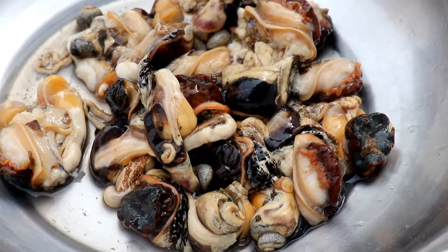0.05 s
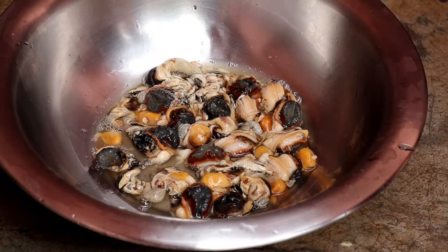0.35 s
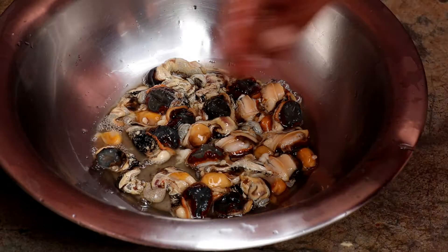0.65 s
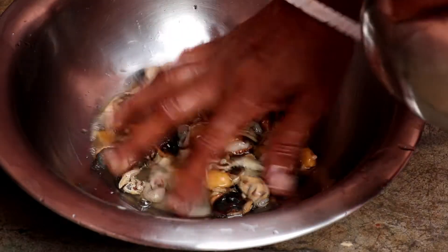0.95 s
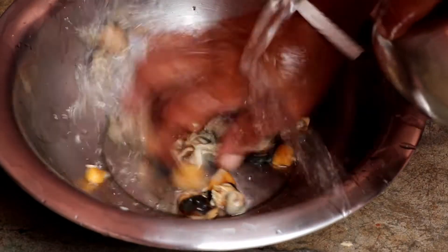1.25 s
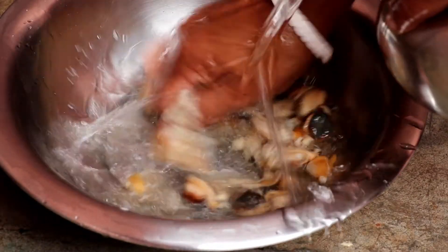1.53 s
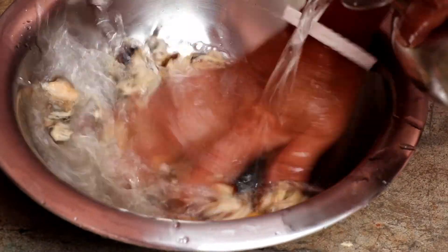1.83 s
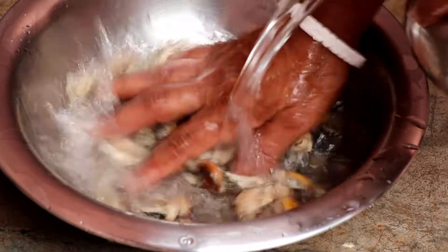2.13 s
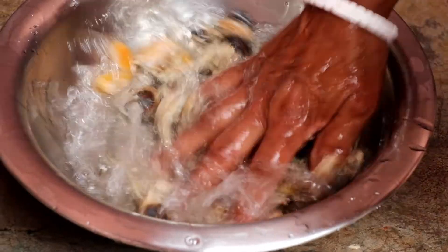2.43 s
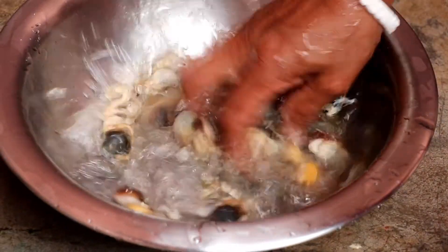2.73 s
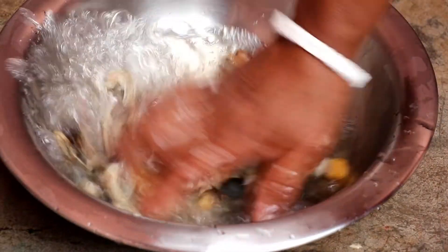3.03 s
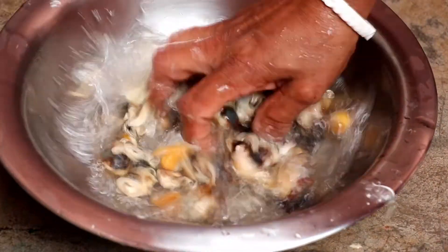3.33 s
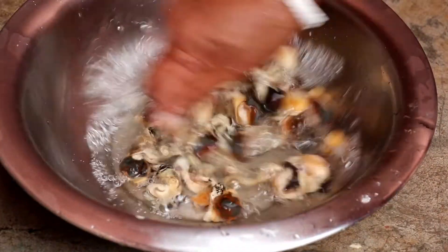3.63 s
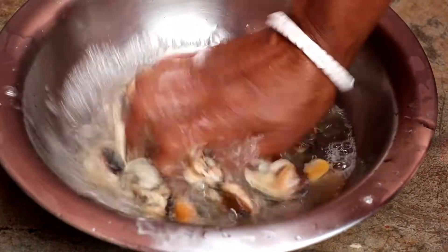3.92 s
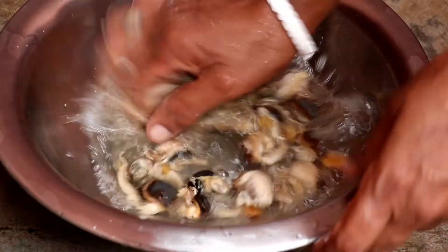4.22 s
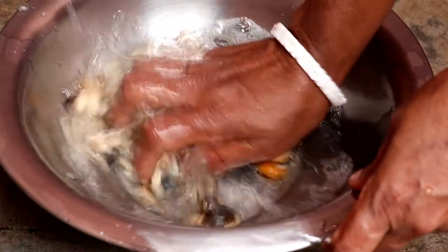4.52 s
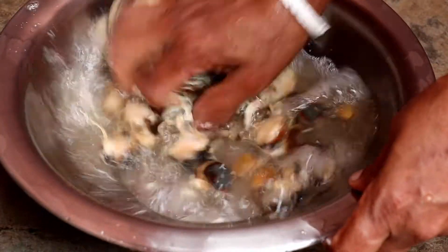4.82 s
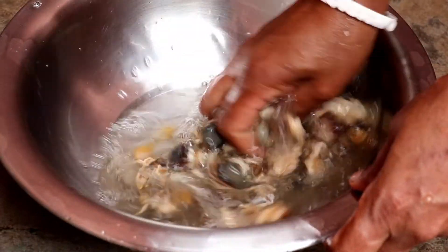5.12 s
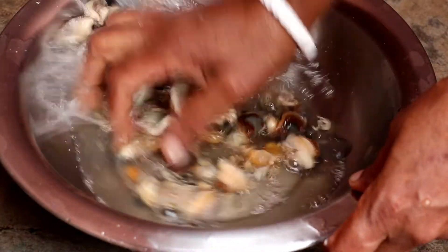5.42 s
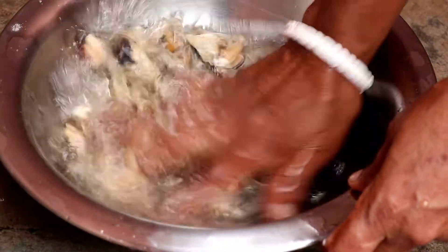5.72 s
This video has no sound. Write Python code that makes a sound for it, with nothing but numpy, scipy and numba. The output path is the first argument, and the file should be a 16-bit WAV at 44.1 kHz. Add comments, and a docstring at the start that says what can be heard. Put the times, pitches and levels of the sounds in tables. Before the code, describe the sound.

Close splashing and sloshing as shellfish meat is washed by hand in a metal bowl, with poured water and occasional clanks.

```python
"""Close over a steel bowl, shellfish meat is washed by hand. Water pours in from a pot and the hand
swirls it in strokes: bubbles ring and spray fizzes in swells, air pockets plop, and sheets of water
slap the wall. Knocks from pot, hand and shells ring the bowl, which also sings softly as it is rubbed.
Before the pouring come a fading hiss, two light contacts and a small bird peeping some way off.
Midway, a few puffs of air push against the microphone."""
import sys
import numpy as np
from scipy import signal
from scipy.fft import rfft, irfft
from scipy.io import wavfile
from scipy.ndimage import uniform_filter1d
from numba import njit

SR = 44100
rng = np.random.default_rng(int(sys.argv[2]) if len(sys.argv) > 2 else 0)


def transcribe(signal):
    """Save signal, clipped to [-1, 1], as a 16-bit WAV file at the path in sys.argv[1]."""
    frames = np.atleast_2d(signal).T
    limited = np.clip(frames, -1, 1)
    pcm = np.round(limited * 32767).astype(np.int16)
    wavfile.write(sys.argv[1], SR, pcm)


N = 262836
TIME = np.arange(N) / SR

# EQ curves of the room tone, the opening hiss and the air puffs: frequency_hz, level_db
ROOM_TONE_EQ = [(18, -40), (40, -19), (110, -13), (190, -7), (380, -8), (700, -19), (1110, -18),
                (2130, -22), (3880, -23), (10700, -35), (15000, -57)]
HISS_EQ = [(88, -61), (150, -37), (262, -20), (318, -30), (364, -11), (459, -20), (1050, -2), (1640, -20.5),
           (2920, -12.5), (3400, -14.5), (3970, -14.5), (4370, -26.5), (15000, -32)]
PUFF_EQ = [(12, -58), (20, -23.5), (75, -14), (161, -11.5), (197, -11.5), (231, -8), (300, -3.5),
           (390, -46.5), (660, -120)]
# Puffs of air on the microphone: crest_s, rise_s, fall_s, level_db
AIR_PUFFS = [(2.8, .09, .13, -61), (3.255, .022, .028, -34), (3.405, .012, .016, -48),
             (3.445, .015, .02, -51), (3.473, .012, .018, -40), (3.55, .03, .025, -53),
             (3.625, .025, .03, -56), (3.705, .04, .03, -58)]
# The bird's rising peeps: start_s, length_s, start_hz, end_hz, level_db
BIRD_PEEPS = [(0.465, 0.13, 3290, 3930, -57), (0.723, 0.15, 3200, 3930, -52.5),
              (0.997, 0.14, 3210, 3800, -51.5)]
# Light dry contacts before the pouring: start_s, level_db, centre_hz, decay_s
DRY_CLACKS = [(0.27, -18, 1355, 0.0054), (0.677, -30.5, 8300, 0.0045)]
# EQ curve of those contacts: frequency_hz, level_db
CLACK_EQ = [(88, -64), (150, -40), (484, -37), (566, -13), (821, -22), (1100, 3.5), (1420, -17),
            (1720, -7.5), (3620, -9.5), (7040, -14.5), (7920, -23), (9820, -17), (16000, -39)]
# Faint hollow tones round the bowl: start_s, length_s, centre_hz, width_hz, level_db
HOLLOW_TONES = [(0.38, 0.55, 1600, 530, -72.5), (5.1, 0.4, 533, 220, -58.5), (5.11, 0.19, 1200, 410, -44),
                (5.09, 0.11, 3520, 450, -47.5), (5.27, 0.25, 1080, 400, -50.5)]
# Soft notes of the rubbed bowl: crest_s, rise_s, fall_s, pitch_hz, glide_hz_per_s, level_db
RUB_NOTES = [(3.9, 0.025, 0.086, 873, 0, -45), (5.0, 0.038, 0.055, 554, 204, -48.5),
             (5.065, 0.048, 0.071, 588, -1.5, -49.5), (5.225, 0.15, 0.067, 767, -100, -40),
             (5.431, 0.089, 0.19, 767, -170, -50)]
# Modes of the steel bowl with a little water in it: pitch_hz, level_db, t60_s
BOWL_MODES = [(555, -11, .27), (673, -22, .3), (765, -21, .28), (971.7, -1, .19), (1015, -8, .12),
              (1192, -8, .13), (1422, 0, .19), (1580, -15, .2), (1744, -10, .12), (2016, -6, .087)]
# Blows on the bowl: start_s, contact_db, first_mode_hz, second_mode_hz, middle_hz, bite_hz, level_db,
# thud_db, bite_db, crack_db, decay_s, ring_db, ring_time_ratio
# (thud, bite, crack and ring are relative to level_db)
BOWL_KNOCKS = [(1.102, -37, 1006, 1440, 1060, 4120, -37.5, -25, 6, 5, 0.039, 3.5, 2.2),
               (1.128, -32, 985, 1454, 1430, 4020, -39, -7.5, 5, 1, 0.035, 12, 1.44),
               (1.312, -20, 938, 1424, 878, 4100, -33.5, -3.5, 4.5, 3.5, 0.051, 6.5, 1.1),
               (1.87, -25.5, 934.4, 1412, 880, 4450, -28.5, -6.5, 1, 2.5, 0.027, 6, 1.63),
               (2.461, -16.5, 966, 1436, 1190, 3600, -22, -22, -9, -18, 0.012, -4, 0.89),
               (2.718, -8, 1127, 1340, 1313, 4000, -19.5, -30.5, 6, -3.5, 0.0053, -7, .5),
               (3.114, -14, 926, 1480, 1050, 2700, -25, 3, 0, -19, .009, 4.5, 1.15),
               (3.306, -5.5, 983, 1368, 1160, 4070, -17.5, -21.5, -8, -14.5, 0.013, 2, 0.47),
               (3.322, -7.5, 1020, 1374, 1260, 4100, -23, -15, -8.5, -21, 0.016, 0, 0.74),
               (3.453, -13, 1058, 1393, 1400, 3700, -22.5, -15, -9.5, -20.5, .03, -2, 0.69),
               (5.097, -3, 890, 1340, 1200, 3440, -11, -16, -8, -8, 0.0064, -14.5, 1.03),
               (5.662, -6, 899, 1310, 1250, 3620, -20.5, -21, -26, -9, 0.0083, -7, 1.6),
               (5.819, -5, 1182, 1500, 1370, 3770, -25, -40, 6, -12, 0.004, -7.5, 0.92)]
# Slaps of water: start_s, tick_db, centre_hz, spray_db, body_re_spray_db, decay_s
WATER_SLAPS = [(1.3877, -6, 6800, -25.5, 2.5, 0.045), (1.4287, -3, 2480, -16, -2, 0.0035),
               (1.732, -5, 7700, -22.5, -1.5, 0.0066), (1.844, -18, 5140, -24, -18, 0.0024),
               (2.2289, -17, 6650, -19, -4, 0.0055), (2.462, -12, 8400, -17.5, -17, 0.0026),
               (2.536, -22, 4860, -26.5, 6, .007), (2.849, -2, 10300, -24.5, -14, .004),
               (2.931, -23, 9400, -27, -2, 0.0036), (3.018, -36.5, 9300, -36, -13, 0.0045),
               (3.072, -32, 8500, -45.5, -2.5, 0.013), (3.223, -9, 7530, -19, 0.5, .0057),
               (3.768, -28, 11500, -38, -18, 0.015), (3.78, -34, 6440, -43.5, -17, .004),
               (3.954, 0, 6400, -30.5, -19, 0.019), (4, 5, 3750, -20, -8.5, .011),
               (4.303, -13.5, 3500, -33, -6, 0.0095), (4.337, -14, 7200, -34.5, -4, .0044),
               (4.476, -5, 8900, -25.5, -20, 0.012), (4.594, 2, 6900, -25.5, 6, 0.0021),
               (4.816, -22, 8600, -40, -14, 0.004), (5.172, -38, 8700, -45, -12, 0.0055),
               (5.2473, -26.5, 8500, -44.5, -36, 0.003), (5.43, -35, 3640, -29, -3, .016),
               (5.486, -20, 7900, -33.5, -4, .0064), (5.647, 1, 3470, -21.5, -5, 0.015),
               (5.8, 3.5, 3220, -25, -1, 0.0078), (5.819, -6, 7200, -19.5, -2, 0.0029),
               (5.9282, -13, 3440, -24.5, -32, 0.02)]
# Air pockets snapping shut: start_s, level_db, pitch_hz, decay_s
AIR_POCKETS = [(1.202, -18.5, 2780, 0.0034), (1.215, -13.5, 3320, 0.0033), (1.262, -20, 2690, 0.0088),
               (1.29, -16, 3040, 0.0055), (1.417, -11, 2330, 0.0049), (1.602, -20, 1640, 0.0072),
               (1.757, -13.5, 2940, 0.019), (1.761, -11, 1262, 0.0097), (1.772, -12.5, 1180, .0041),
               (1.796, -15.5, 1340, 0.0091), (1.84, -10.5, 2310, 0.0029), (2.01, -6.5, 6730, 0.0016),
               (2.072, -11.5, 1694, 0.0029), (2.124, -9.5, 1310, 0.003), (2.152, -15, 1573, 0.012),
               (2.295, -17, 1426, 0.021), (2.362, -13.5, 1490, .0034), (2.431, -17, 2030, 0.01),
               (2.441, -14, 2170, .008), (2.477, -9.5, 1094, 0.0078), (2.51, -17, 1405, 0.015),
               (2.568, -9.5, 2170, 0.0041), (2.574, -13.5, 2170, .004), (2.63, -13.5, 2970, 0.0061),
               (2.706, -12, 2830, 0.0059), (2.812, -18.5, 3740, 0.0063), (2.835, -19, 6500, 0.0027),
               (2.886, -18.5, 1190, 0.0036), (2.908, -17, 4180, 0.0027), (2.929, -17.5, 2440, .0037),
               (3.258, -25, 1120, 0.011), (3.398, -7.5, 2940, 0.0039), (3.467, -12.5, 1646, 0.014),
               (3.494, -8.5, 1665, 0.0036), (3.495, -16, 2670, 0.0065), (3.849, -21.5, 8850, 0.0037),
               (3.862, -28, 2950, .009), (3.883, -30.5, 8400, 0.01), (3.938, -20, 2960, 0.0095),
               (3.994, -8, 2190, 0.0062), (4.024, -10.5, 1270, 0.0042), (4.052, -23, 2690, 0.0046),
               (4.195, -35.5, 3410, 0.0052), (4.152, -21, 1940, 0.0049), (4.24, -30, 3720, 0.0023),
               (4.286, -29, 3360, .005), (4.328, -19.5, 7260, .002), (4.382, -22, 6740, 0.0065),
               (4.443, -22.5, 1820, 0.0024), (4.484, -8, 3560, 0.0016), (4.505, -16.5, 1635, 0.0058),
               (4.577, -11.5, 2830, 0.0028), (4.628, -12, 3190, .002), (4.732, -8, 3060, 0.0027),
               (4.741, -16, 6940, 0.0039), (4.848, -6, 1403, 0.0036), (4.88, -13, 1740, 0.0041),
               (4.979, -24.5, 1720, 0.0059), (5.043, -8, 3280, 0.0033), (5.335, -35, 6660, 0.004),
               (5.585, -20, 1616, 0.0058), (5.633, -19.5, 3050, 0.0034), (5.648, -4.5, 2050, 0.0042),
               (5.776, -17, 3500, 0.0074)]
# Strokes of the hand through the water: crest_s, rise_s, fall_s, gurgle_db, patter_db, spray_db
HAND_STROKES = [(1.38, 0.18, 0.36, -41.5, -34, -32), (1.776, .075, 0.21, -36, -27.5, -35),
                (2.105, 0.33, 0.33, -30, -31.5, -31.5), (2.239, .27, 0.31, -45, -30.5, -35),
                (2.461, 0.32, 0.23, -34.5, -34, -33.5), (2.655, 0.085, 0.13, -45.5, -36.5, -35.5),
                (2.745, .05, 0.088, -35, -35.5, -40.5), (2.845, 0.12, .15, -37, -39, -37),
                (3.218, 0.062, 0.17, -32, -33.5, -39), (3.42, 0.23, .15, -36.5, -38.5, -45),
                (3.89, 0.075, 0.11, -50.5, -47.5, -52), (4.014, 0.12, .16, -39, -38.5, -43),
                (4.395, 0.096, .17, -63, -43, -43.5), (4.508, .06, 0.3, -48.5, -35.5, -37.5),
                (4.66, 0.25, .15, -54.5, -34, -40), (4.898, 0.12, .18, -46.5, -41.5, -58.5),
                (5.17, 0.075, 0.068, -41, -59, -49), (5.481, 0.06, .12, -47, -60.5, -47),
                (5.703, 0.085, 0.53, -32.5, -49.5, -40), (5.838, 0.21, 0.2, -42, -28.5, -36)]
# Dips in the water's upper mids: deepest_s, rise_s, fall_s, centre_hz, depth_ratio
MID_DIPS = [(1.61, 0.11, 0.3, 4290, 0.98), (2.42, 0.09, 0.061, 4400, 0.95)]
# EQ curves of the poured stream and of water stirred by hand: frequency_hz, level_db
POUR_EQ = [(88, -45.5), (150, -33.5), (398, -28), (457, -34.5), (545, -12), (821, -15), (923, -2),
           (1020, -4.5), (1500, -1), (2140, -4.5), (3700, -2.5), (5150, -7), (6640, -3.5), (12700, -16.5),
           (16000, -30.5)]
STIR_EQ = [(88, -71), (150, -28.5), (475, -14), (578, -5.5), (774, -8.5), (871, -1), (998, -4.5),
           (1140, 3.5), (1720, -2), (3040, -2.5), (4000, -12.5), (5050, -21.5), (6910, -19), (13200, -32),
           (16000, -44.5)]

POUR_START_S, POUR_ATTACK_S, POUR_FADE_MIDDLE_S, POUR_FADE_S = 1.129, 0.057, 2.38, 0.78
# The stream's gurgle, patter and spray: starting drive, and its drift as the bowl fills
POUR_DB, FILL_DB_PER_S = (-63, -43.5, -30.5), (15, 8, -13)
# The water's weight pulls the bowl's tuning at the middle two anchors; the outer two stay put
ANCHOR_HZ = (556, 980, 1437, 3400)
HIGH_MODES_HZ = np.geomspace(2200, 6600, num=32)  # the bowl's crowd of close, short upper modes
HIGH_MODES_DB, HIGH_SCATTER_DB, HIGH_T60_S = -9, 4, .17
MIDDLE_DB_PER_OCTAVE, BITE_DB_PER_OCTAVE = 8.5, 30  # modes weaken away from a blow's middle and bite


def undb(db):
    """Decibels to gain."""
    return 10 ** (np.asarray(db) / 20)


def unit(x):
    """Scale to rms 1."""
    return x / np.sqrt(np.mean(x ** 2) + 1e-18)


def eq(x, curve):
    """Shape a sound with a curve of (frequency_hz, level_db) points."""
    hz, db = np.transpose(curve)
    bins_hz = np.fft.rfftfreq(x.shape[-1], 1 / SR) + 1
    return irfft(rfft(x) * undb(np.interp(np.log(bins_hz), np.log(hz), db)), x.shape[-1])


def band(x, lo_hz, hi_hz, order=2):
    """Causal band-pass."""
    edges = np.minimum([lo_hz, hi_hz], [.4 * SR, .47 * SR])
    return signal.sosfilt(signal.butter(order, edges, "band", fs=SR, output="sos"), x)


def add(out, start_s, sound):
    """Mix a short sound in at its cue."""
    i = max(int(start_s * SR), 0)
    out[..., i:i + sound.shape[-1]] += sound[..., :N - i]


def burst(t, rise_s, decay_s):
    """Envelope with a rounded attack and an exponential tail."""
    return (1 - np.exp(-t / max(rise_s, 1e-5))) ** 2 * np.exp(-t / max(decay_s, 1e-3))


def swell(crest_s, rise_s, fall_s):
    """Envelope that climbs 20 dB in rise_s to a rounded crest and drops as much in fall_s."""
    away = np.maximum((crest_s - TIME) / max(rise_s, .01), (TIME - crest_s) / max(fall_s, .01))
    return undb(-20 * np.minimum(away, 10) ** 1.324)


def wander(rate_hz):
    """Smooth random modulation of rms 1."""
    step = int(SR / rate_hz)
    return unit(uniform_filter1d(np.repeat(rng.standard_normal(N // step + 1), step), step)[:N])


def stereo_noise(size, side):
    """Mid/side noise; more side makes it wider."""
    mid, other = rng.standard_normal((2, size))
    return unit(np.array([mid + side * other, mid - side * other]))


def tick(t, lo_hz, hi_hz, decay_s):
    """The noisy transient of first contact."""
    return unit(band(stereo_noise(len(t), side=0.43), lo_hz, hi_hz, order=3)) * burst(t, 0.00035, decay_s)


def air():
    """Room tone, a soft hiss that dies away at the start, and low puffs, mostly on the left."""
    room_tone = undb(-76.5) * unit(eq(stereo_noise(N, side=0.19), ROOM_TONE_EQ))
    fade = undb(-53.5 - 79 * TIME) * (TIME < 0.62)
    hiss = fade * unit(eq(stereo_noise(N, side=0.79), HISS_EQ))
    gusts = sum(undb(db) * swell(crest_s, rise_s, fall_s) for crest_s, rise_s, fall_s, db in AIR_PUFFS)
    draught = undb(-61) * swell(crest_s=3.3, rise_s=.4, fall_s=.35)
    puffs = (gusts + draught) * unit(band(eq(rng.standard_normal((2, N)), PUFF_EQ), 35, 105))
    return room_tone + hiss + puffs * undb([[4], [-11]])


def bird():
    """Raspy upward whistles, joined late by a higher voice and smeared by the walls they come round."""
    out, t = np.zeros(N), TIME[:SR // 4]
    for start_s, length_s, start_hz, end_hz, db in BIRD_PEEPS:
        age = np.linspace(0, 1, int(length_s * SR))
        rasp = 1 + .06 * wander(1100)[:len(age)]
        hz = rasp * (start_hz + (end_hz - start_hz) * age)
        phase = 2 * np.pi * np.cumsum(hz) / SR
        upper_voice = undb(-6.5) * 2 * age ** 2 * np.sin(1.25 * phase)
        add(out, start_s, undb(db) * np.sin(np.pi * age) * (np.sin(phase) + upper_voice))
    walls = unit(stereo_noise(len(t), side=0.99) * 1000 ** (-t / 0.19)) / np.sqrt(len(t))
    return signal.fftconvolve(out[None], walls, axes=1)[:, :N]


def reflections(x, bowl_db, bowl_t60_s, room_db, room_t60_s, room_top_hz):
    """Quick bright echoes off the bowl's wall and a faint dull room, different in each channel."""
    response, t = 0, TIME[:SR // 2]
    for db, t60_s, top_hz in ((bowl_db, bowl_t60_s, 14000), (room_db, room_t60_s, room_top_hz)):
        noise = band(rng.standard_normal((2, len(t))), 350, top_hz, order=1)
        tail = noise * 1000 ** (-t / t60_s) * (t > t60_s / 60)  # starts after a short pre-delay
        response = response + undb(db) * unit(tail) / np.sqrt(2 * len(t))
    return signal.fftconvolve(x, response, axes=1)[:, :N]


def clacks():
    """Light hard contacts, each strongest round its own pitch, with a short tail."""
    out, t = np.zeros((2, N)), TIME[:SR // 4]
    for start_s, db, hz, decay_s in DRY_CLACKS:
        noise = stereo_noise(len(t), side=0.75)
        body = unit(eq(noise, CLACK_EQ)) * min(1, (1400 / hz) ** 2)
        resonance = 0.78 * unit(band(noise, hz * 0.923, hz * 1.18, order=3))
        envelope = burst(t, 0.0012, decay_s) + undb(-14.5) * burst(t, 0.0058, 0.024)
        add(out, start_s, undb(db - 6) * (body + resonance) * envelope)
    return out


def hollow_tones():
    """Narrow bands of resonance swell and fade round the bowl."""
    out = np.zeros(N)
    for start_s, length_s, hz, width_hz, db in HOLLOW_TONES:
        size = int(length_s * SR)
        tone = unit(band(rng.standard_normal(SR), hz - width_hz / 2, hz + width_hz / 2)[-size:])
        add(out, start_s, undb(db) * tone * np.hanning(size) ** .5)
    return out


def bowl_singing():
    """Single low modes of the rubbed bowl sing softly and drift in pitch as the water shifts."""
    out = 0
    for crest_s, rise_s, fall_s, hz, glide_hz_per_s, db in RUB_NOTES:
        pitch_hz = (hz + glide_hz_per_s * (TIME - crest_s)) * (1 + .014 * wander(110))
        envelope = undb(db) * swell(crest_s, rise_s, fall_s) * undb(2 * wander(39))
        out = out + envelope * np.sin(2 * np.pi * np.cumsum(pitch_hz) / SR)
    return out


def modes(t, hz, db, t60_s):
    """Dying sines, given as columns; the higher ones reach the two channels out of step."""
    phase = rng.uniform(0, 2 * np.pi, hz.shape) + hz / 3500 * rng.standard_normal((2, *hz.shape))
    return np.sum(undb(db) * 1000 ** (-t / t60_s) * np.sin(2 * np.pi * hz * t + phase), axis=1)


def bowl_ring(t, first_hz, second_hz, middle_hz, bite_hz, bite_db, ring_time_ratio):
    """The struck steel rings; the water's weight shifts its modes and the hand sets how long they last."""
    rest_hz, mode_db, t60_s = np.transpose(BOWL_MODES)[:, :, None]
    pull = np.divide([ANCHOR_HZ[0], first_hz, second_hz, ANCHOR_HZ[3]], ANCHOR_HZ)
    low_hz = rest_hz * np.interp(rest_hz, ANCHOR_HZ, pull)
    low_db = mode_db - MIDDLE_DB_PER_OCTAVE * np.abs(np.log2(low_hz / middle_hz))
    low_ring = modes(t, low_hz, low_db, t60_s * ring_time_ratio)
    detune, strength = rng.standard_normal((2, len(HIGH_MODES_HZ), 1))  # each blow hits another spot
    high_hz = HIGH_MODES_HZ[:, None] * (1 + .01 * detune)
    rolloff_db = BITE_DB_PER_OCTAVE * np.abs(np.log2(high_hz / bite_hz))
    high_db = bite_db + HIGH_MODES_DB + HIGH_SCATTER_DB * strength - rolloff_db
    return low_ring + undb(-6) * modes(t, high_hz, high_db, HIGH_T60_S * ring_time_ratio)


def knocks():
    """Pot, hand and shells strike the bowl: a thock, a noisy blow, the ring and a thump on the floor."""
    out, t = np.zeros((2, N)), TIME[:SR // 3]
    for (start_s, contact_db, first_hz, second_hz, middle_hz, bite_hz, db,
         thud_db, bite_db, crack_db, decay_s, ring_db, ring_time_ratio) in BOWL_KNOCKS:
        ring = bowl_ring(t, first_hz, second_hz, middle_hz, bite_hz, bite_db, ring_time_ratio)
        noise = stereo_noise(len(t), side=0.77)
        thud = undb(thud_db) * unit(band(noise, 440, 900, order=3))
        middle = unit(band(noise, middle_hz * .78, middle_hz * 1.31, order=3))
        bite = undb(bite_db) * unit(band(noise, bite_hz / 1.15, bite_hz * 1.093))
        crack = undb(crack_db) * unit(band(noise, 5900, 9800, order=3))
        blow = (thud + middle + bite + crack) * burst(t, 0.0013, decay_s)
        add(out, start_s, undb(db + 4) * (blow + undb(ring_db) * ring * burst(t, 0.00014, 0.56)))
        thock = np.sin(2 * np.pi * middle_hz * t) * burst(t, .0005, .0025)
        contact = thock + .3 * tick(t, 1500, 5000, decay_s=.001)
        add(out, start_s, undb(contact_db + 1.5) * band(contact, 450, 9000, order=3))
        thump = unit(band(noise, 220, 440)) * burst(t, .001, 2 * decay_s)
        add(out, start_s, undb(db - 26.5) * thump)
    return out


def slaps():
    """A sheet of water hits the wall with a tick and breaks into grainy spray over a lower body."""
    out, t = np.zeros((2, N)), TIME[:SR // 5]
    for start_s, tick_db, hz, spray_db, body_db, decay_s in WATER_SLAPS:
        noise = stereo_noise(len(t), side=0.74)
        grain_steps = np.repeat(rng.standard_normal(len(t)), 70)[:len(t)]
        grain = undb(4 * uniform_filter1d(grain_steps, size=70))
        spray = unit(band(noise, hz * 0.825, hz * 1.092, order=3))
        sizzle = undb(-4) * unit(band(noise, 4000, 10680, order=3))
        body = undb(body_db - 1) * unit(band(noise, 960, 3650, order=4))
        splash = (spray + sizzle + body) * grain * burst(t, 0.5 * decay_s, decay_s)
        add(out, start_s - .002, undb(spray_db + 7.5) * splash)
        add(out, start_s + 0.00082, undb(tick_db - 10.5) * tick(t, hz * 0.67, hz * 1.97, decay_s=.0007))
    return out


def plops():
    """A pocket of air snaps shut, rings briefly and rises in pitch, inside a gush of smaller bubbles."""
    out, t = np.zeros((2, N)), TIME[:SR // 8]
    bend = .97 + 0.1 * (1 - np.exp(-t / 0.024))
    for start_s, db, hz, decay_s in AIR_POCKETS:
        phase = 2 * np.pi * np.cumsum(hz * bend) / SR
        ring = np.sin(phase + rng.standard_normal((2, 1)) * hz / 5000)  # higher plops sound wider
        gush = unit(band(stereo_noise(len(t), side=0.35), hz * 0.81, hz * 1.244, order=3))
        pop = np.exp(-((t - .0016) / .0007) ** 2) * ring
        pocket = .6 * (burst(t, .001, decay_s) * (ring + gush) + pop)
        add(out, start_s - .001, undb(db - 2.5) * band(pocket, hz * .6, hz * 4, order=3))
    return out


@njit
def ring_grains(start, hz, cycles, glide, left, right):
    """Each grain is a dying sine whose pitch climbs as the bubble nears the surface."""
    out = np.zeros((2, N))
    for k in range(len(start)):
        size = int(2 * cycles[k] * SR / hz[k])
        phase = 0.
        for j in range(min(size, N - start[k])):
            age = j / size
            phase += 2 * np.pi * hz[k] * (1 + glide * age) / SR
            sample = np.sin(phase) * np.exp(-6 * age) * min(1., 14 * age)
            out[0, start[k] + j] += left[k] * sample
            out[1, start[k] + j] += right[k] * sample
    return out


def cloud(drive, per_s, lo_hz, hi_hz, cycles, spread_db, width, glide):
    """A cloud of bubble grains at rms 1, denser where the water is driven harder."""
    when, pitch, length, strength, chance, pan = rng.random((int(per_s * N / SR), 6)).T
    start = (when * (N - 1)).astype(int)
    density = np.clip(np.sqrt(drive / np.percentile(drive, 85)), .1, 1)[start]
    hz = lo_hz * (hi_hz / lo_hz) ** pitch
    life = cycles * 3 ** (length - .5)
    gain = undb(-spread_db * np.log(strength * .98 + .02)) * (chance < density) / np.sqrt(density)
    gain = gain * hz / np.sqrt(life)  # the same energy in every hertz
    angle = np.pi / 4 + width * (2 * pan - 1)
    return unit(ring_grains(start, hz, life, glide, gain * np.cos(angle), gain * np.sin(angle)))


def spatter(spray):
    """Thrown drops land on steel and skin as sharp clicks of very uneven strength."""
    clicks = cloud(spray, per_s=110, lo_hz=2500, hi_hz=12200, cycles=6, spread_db=2.5, width=1, glide=.05)
    return undb(-11) * spray * clicks


def squirts(x, rate_hz, depth_db):
    """Water squeezed between fingers comes in separate squirts, each strong round its own pitch."""
    out, together = 0, wander(rate_hz)
    for hz in np.geomspace(1900, 15000, num=7):
        out = out + band(x, hz / 1.19, hz * 1.19) * undb(depth_db * (wander(rate_hz) + .5 * together))
    return out


def scoop_mids(x):
    """A broad notch opens and closes in the sound of the water."""
    for deepest_s, rise_s, fall_s, hz, depth in MID_DIPS:
        mids = eq(x, [(hz / 1.6, -40), (hz / 1.2, -1), (hz, 0), (hz * 1.13, -1), (hz * 1.45, -40)])
        x = x - depth * swell(deepest_s, rise_s, fall_s) ** .5 * mids
    return x


def flow():
    """The pour's fade-out and the gurgle, patter and spray envelopes; stream and strokes add in power."""
    age_s = TIME - POUR_START_S
    pouring = np.clip((POUR_FADE_MIDDLE_S - TIME) / POUR_FADE_S + .5, 0, 1)
    stream = np.clip(age_s / POUR_ATTACK_S, 0, 1) * pouring
    filling = np.array([undb(db + slope * age_s) for db, slope in zip(POUR_DB, FILL_DB_PER_S)])
    power = (stream * filling) ** 2
    for crest_s, rise_s, fall_s, *levels_db in HAND_STROKES:
        power = power + np.outer(undb(levels_db), swell(crest_s, rise_s, fall_s)) ** 2
    return pouring, np.sqrt(power)


def water(pouring, gurgle, patter, spray):
    """Big bubbles gurgle, small ones patter, spray fizzes; the tone crossfades from poured to stirred."""
    big = cloud(gurgle, per_s=480, lo_hz=900, hi_hz=2100, cycles=6.7, spread_db=2.8, width=.65, glide=.26)
    big += undb(-8.5) * unit(band(stereo_noise(N, side=0.11), 110, 1800))
    small = cloud(patter, per_s=1500, lo_hz=2102, hi_hz=4740, cycles=9, spread_db=3.1, width=1, glide=.2)
    fizz = cloud(spray, per_s=2200, lo_hz=5130, hi_hz=15000, cycles=22,
                 spread_db=2.8, width=1.98, glide=.091)
    mist = band(stereo_noise(N, side=0.16), 4300, 23000, order=4) * undb(1.7 * wander(120))
    fizz += undb(-0.5) * unit(mist)
    # a few lone bubbles ring long enough to be heard as drips and pings
    drips = .33 * cloud(patter, per_s=130, lo_hz=1900, hi_hz=3900, cycles=24,
                        spread_db=2.5, width=.8, glide=.26)
    pings = .55 * cloud(spray, per_s=110, lo_hz=5600, hi_hz=9500, cycles=60,
                        spread_db=2.5, width=1, glide=.08)

    def crossfade(poured, stirred):
        return pouring * unit(eq(poured, POUR_EQ)) + (1 - pouring) * unit(eq(stirred, STIR_EQ))

    lows = crossfade(big, big)
    mids = crossfade(squirts(small + drips, rate_hz=160, depth_db=1.8),
                     squirts(small + drips, rate_hz=190, depth_db=2.2))
    highs = crossfade(squirts(fizz + pings, rate_hz=240, depth_db=2.4),
                      squirts(fizz + pings / 2, rate_hz=150, depth_db=3.2))
    return scoop_mids(undb(3) * gurgle * lows + undb(2.7) * patter * mids + undb(2.9) * spray * highs)


def scene():
    """All in the bowl shares its echoes; the water sloshes and rumbles faintly; bird and air lie behind."""
    pouring, (gurgle, patter, spray) = flow()
    washing = water(pouring, gurgle, patter, spray) + spatter(spray) + plops() + slaps()
    slosh = undb(-41) * np.sqrt(patter * patter.max()) * unit(band(stereo_noise(N, side=.4), 240, 600))
    close = washing + clacks() + hollow_tones() + bowl_singing()
    close = band(close, 170, 20000, order=3)  # so small a bowl radiates little bass
    close = close + knocks() + slosh
    echoes = reflections(close, bowl_db=-8, bowl_t60_s=.04, room_db=-16, room_t60_s=.24, room_top_hz=5000)
    rumble = undb(-45) * np.hypot(gurgle, spray) * unit(band(stereo_noise(N, side=0.56), 30, 140))
    return close + echoes + rumble + bird() + air()


def record(dry):
    """Soft clipping rounds the highest peaks and a steep low-pass cuts the top."""
    return signal.sosfilt(signal.ellip(10, .2, 80, 16300, fs=SR, output="sos"), np.tanh(dry))


dry = scene()
out = record(dry)
transcribe(out)
```